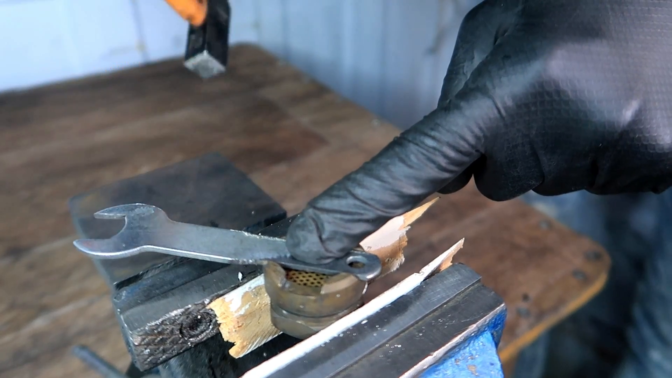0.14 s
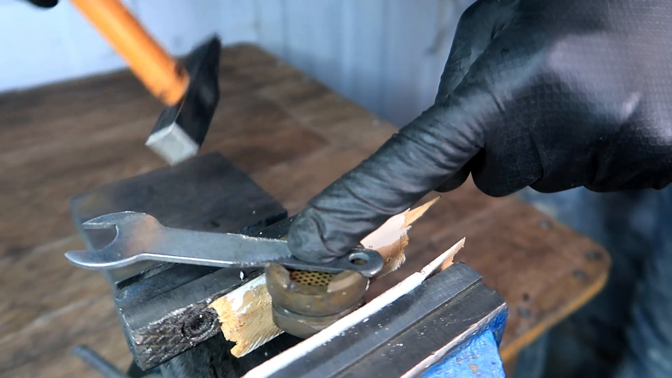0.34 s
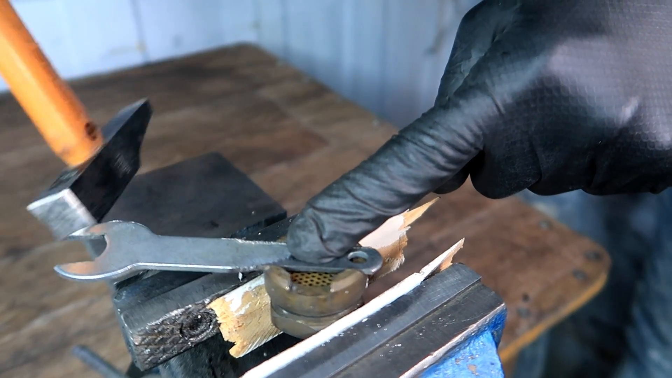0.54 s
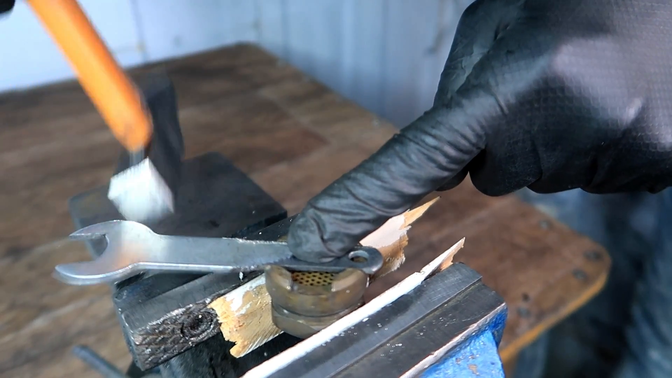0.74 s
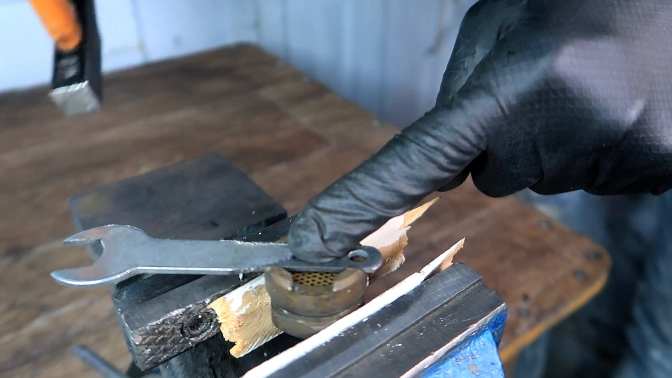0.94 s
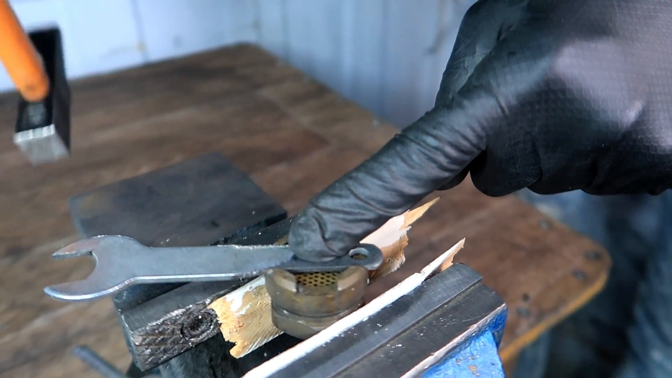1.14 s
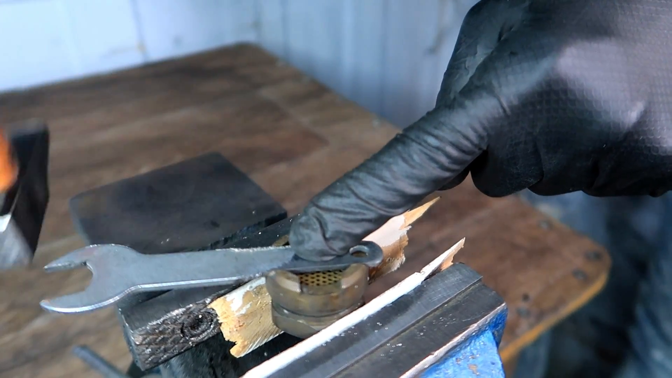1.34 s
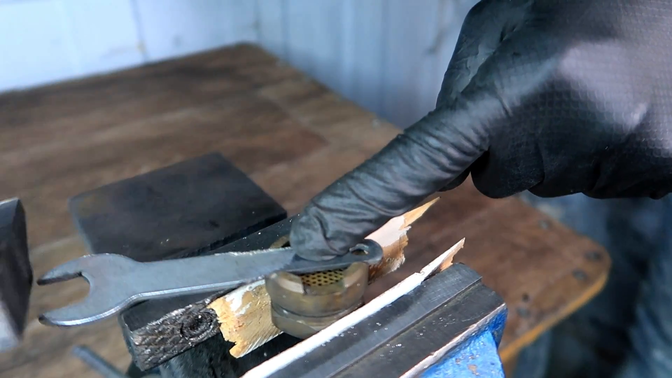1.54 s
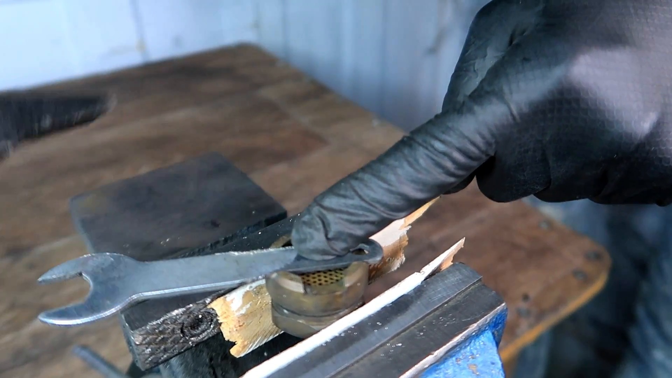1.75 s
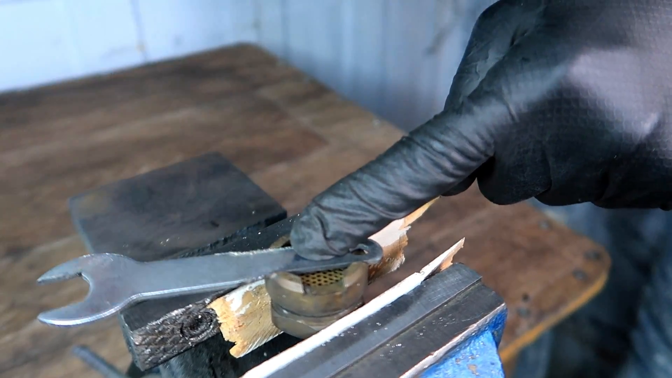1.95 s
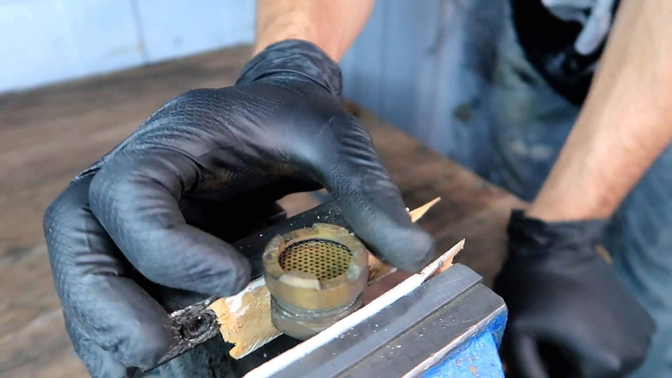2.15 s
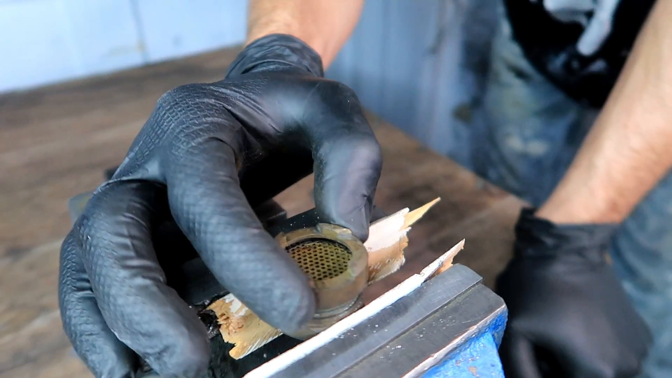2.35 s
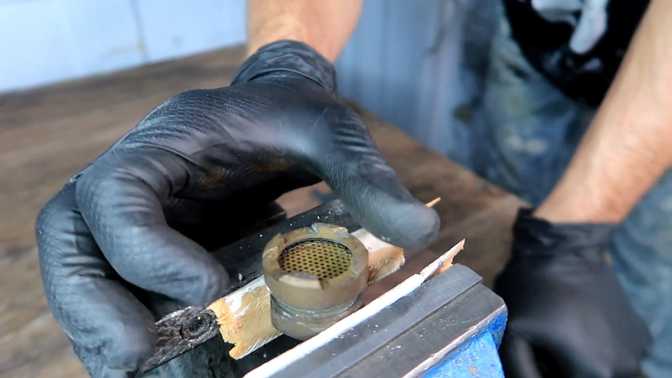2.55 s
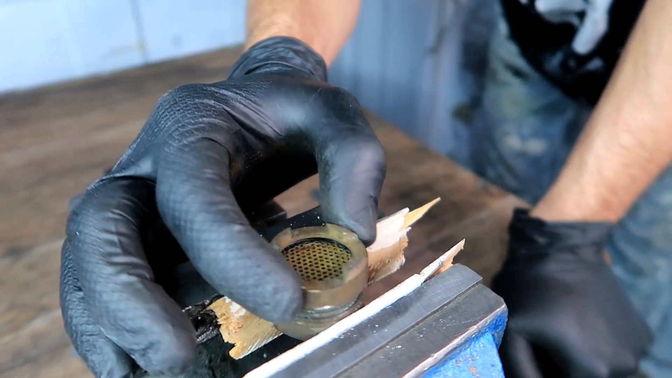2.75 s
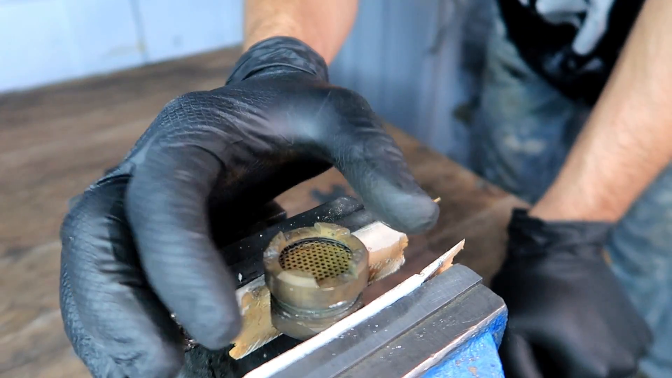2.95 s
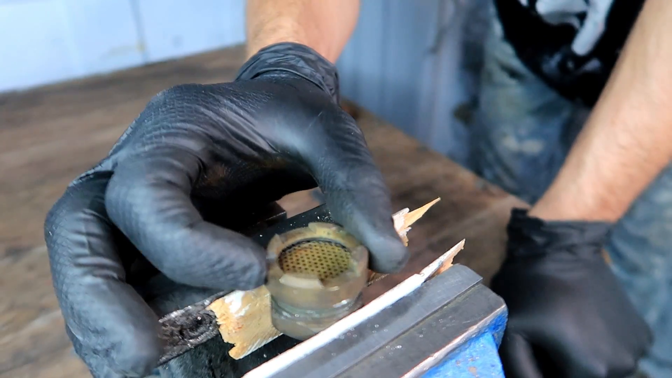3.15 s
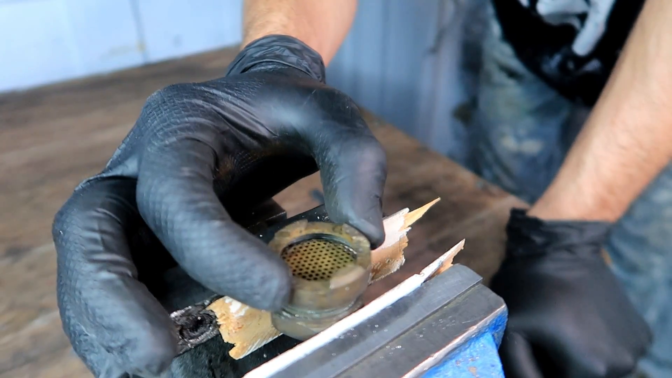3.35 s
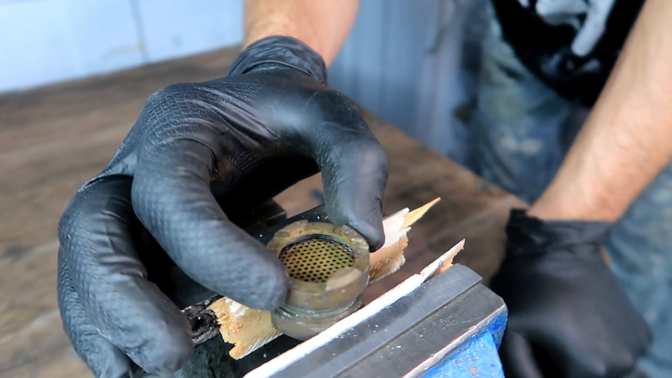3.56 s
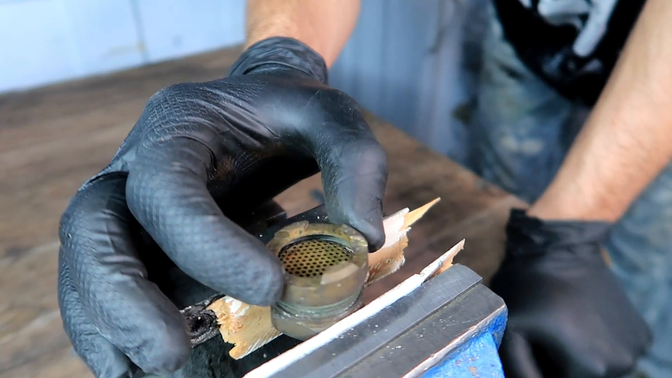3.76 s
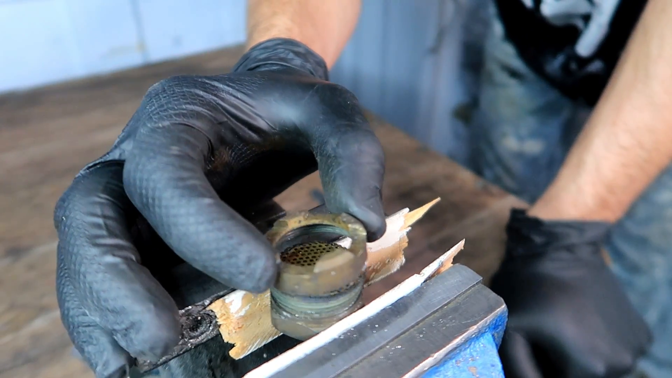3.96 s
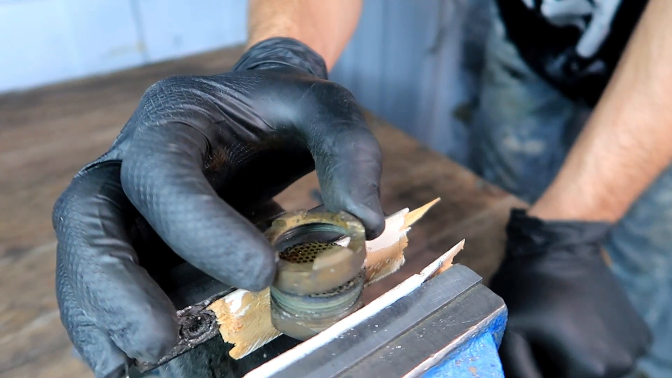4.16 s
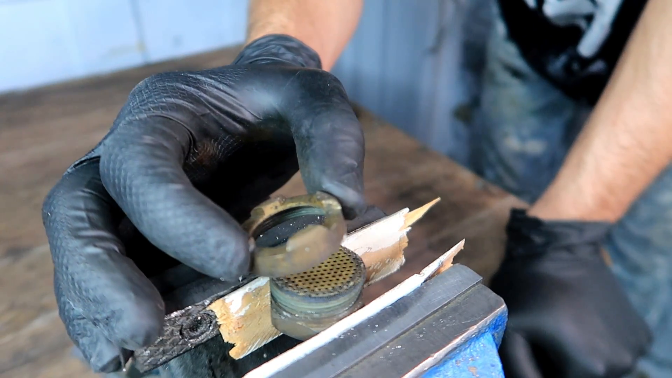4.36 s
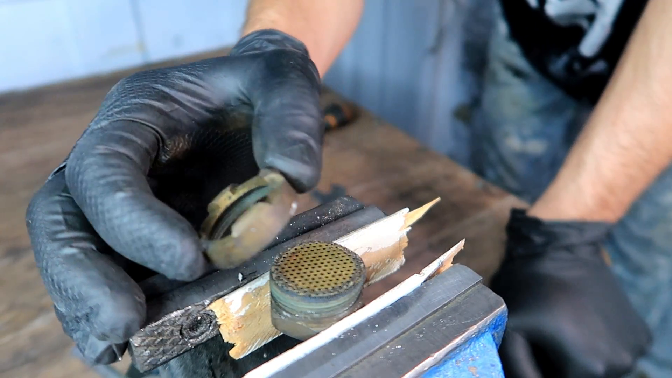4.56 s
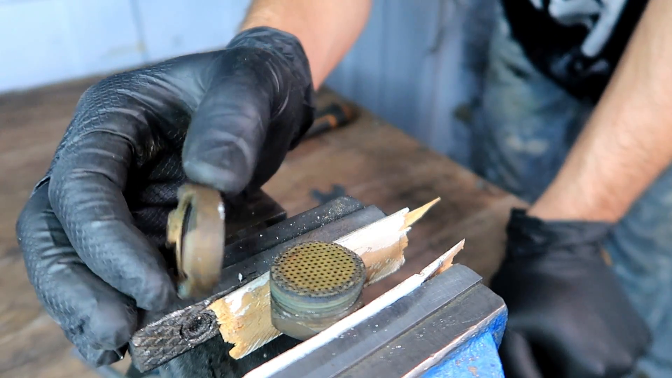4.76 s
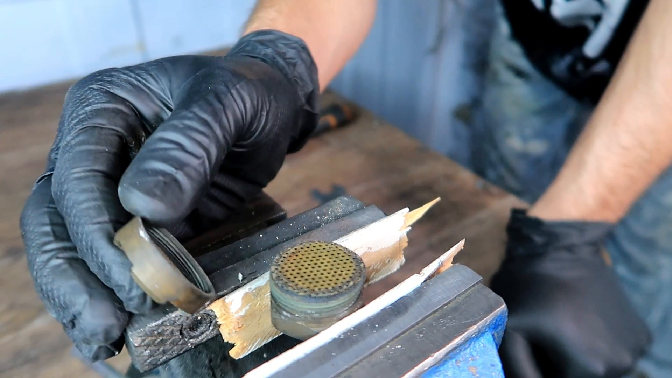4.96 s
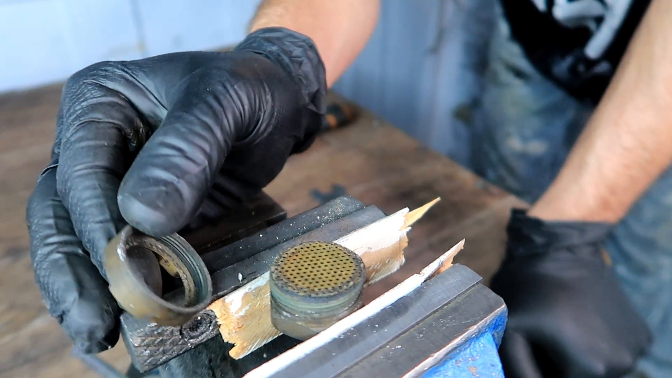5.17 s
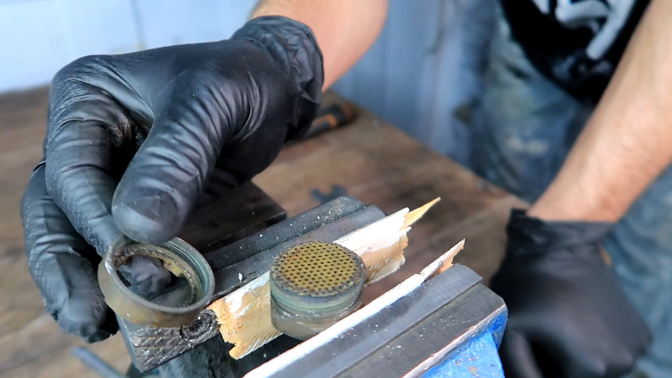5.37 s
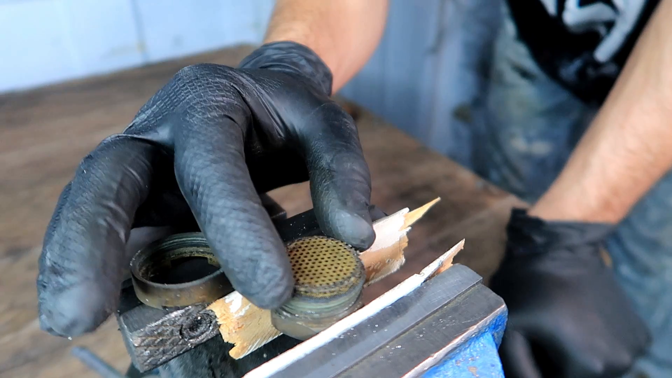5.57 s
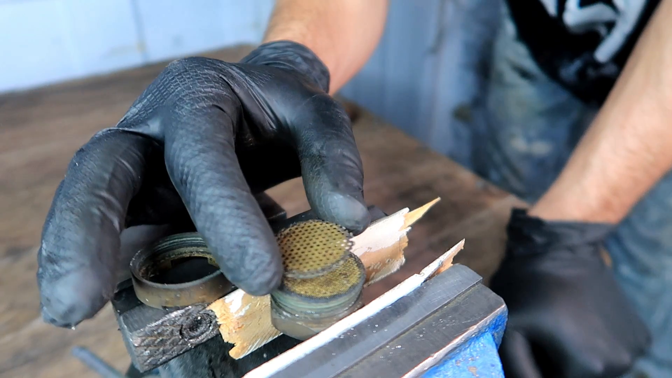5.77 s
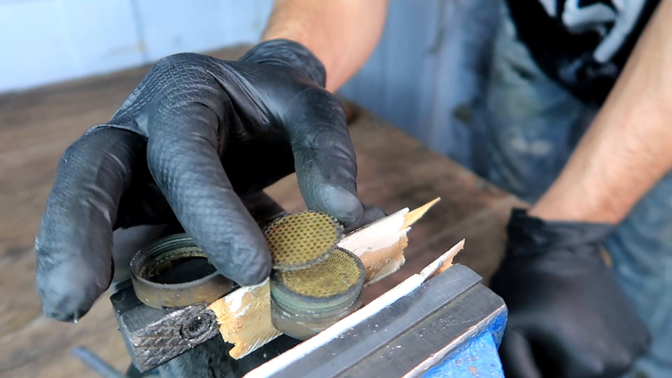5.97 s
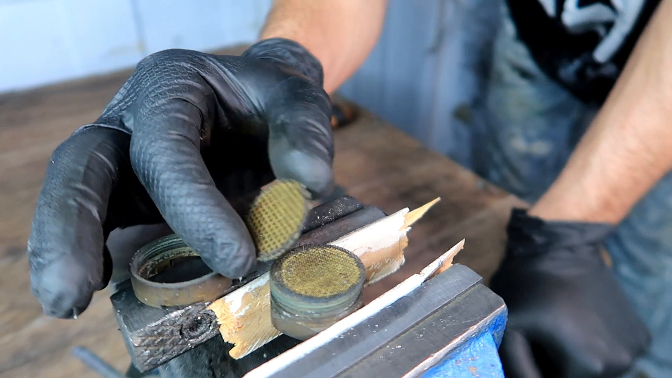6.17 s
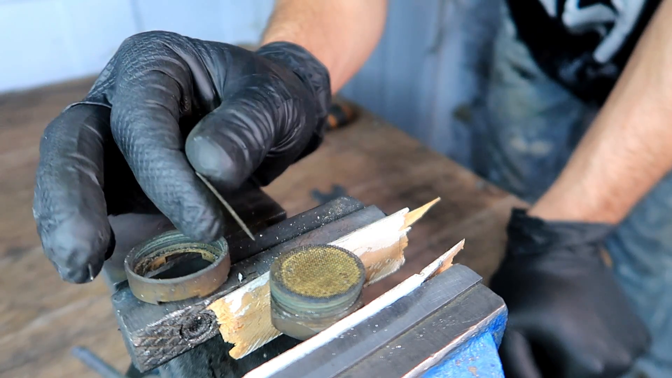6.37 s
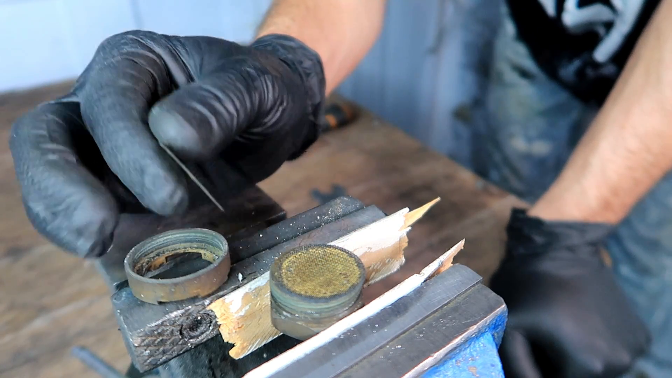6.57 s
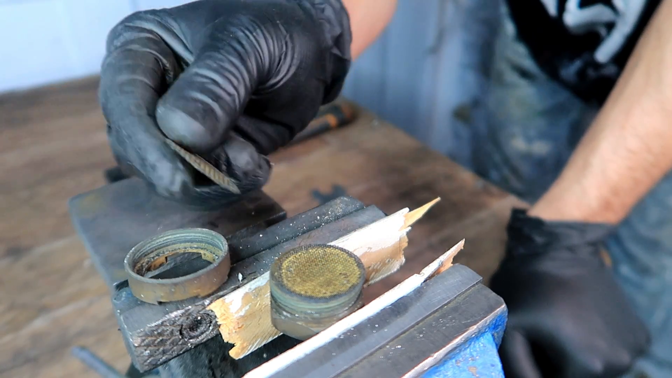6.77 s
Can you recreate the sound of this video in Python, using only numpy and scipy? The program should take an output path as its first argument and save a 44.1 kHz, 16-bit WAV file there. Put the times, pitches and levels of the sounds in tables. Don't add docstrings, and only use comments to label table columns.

```python
import sys
import numpy as np
from scipy import signal
from scipy.fft import rfft, irfft, next_fast_len
from scipy.io import wavfile
from scipy.ndimage import uniform_filter1d

SR = 44100
rng = np.random.default_rng(int(sys.argv[2]) if len(sys.argv) > 2 else 0)


def natural_amplitude(level_db):
    exponent = np.asarray(level_db, float) / 20
    return 10 ** exponent


def digitize_waveform(pressure):
    field = np.atleast_2d(pressure).T
    bounded = np.clip(field, -1, 1)
    quanta = np.round(bounded * 32767).astype(np.int16)
    wavfile.write(sys.argv[1], SR, quanta)


N = 300321
SIZE = next_fast_len(N)
HZ = np.fft.rfftfreq(SIZE, 1 / SR)

# pitch in Hz, level in dB per Hz.
AIR_COLOUR = [(12, -44), (20, -12.5), (63, -2), (86, -21.5), (111, -7.5), (147, -29.5), (169, -13.5),
              (323, -15), (465, -15.5), (535, -18), (939, -20), (11500, -39.5), (16500, -50.5)]
# pitch in Hz, width of its wavering in Hz, level in dB.
MAINS_HUM = [(61, 2.3, -74.5), (123, 7, -77.5), (182.8, 5.4, -81.5), (11700, 30, -104)]
# pitch in Hz, likeness from -1 to 1.
AIR_LIKENESS = [(60, 1), (150, 0.4), (380, 0.071), (950, -0.45), (2380, 0.14), (5980, -0.24),
                (15000, -0.83)]
# pitch in Hz, t60 in seconds.
SHOP_T60 = [(100, 0.27), (500, 0.25), (2000, 0.33), (8000, 0.15), (16000, 0.064)]
# pitch in Hz, likeness from -1 to 1.
SHOP_LIKENESS = [(60, 1), (150, .999), (400, .97), (1000, .96), (2400, .7), (6000, -.1), (15000, -.1)]
# pitch in Hz, phase in radians.
PORT_LEAD = [(60, 0), (300, -.03), (1500, -.2), (3000, -.45), (6000, -1.0), (9000, -2.1), (12000, -2.3),
             (16000, -2.6)]
# pitch in Hz, level in dB, t60 in seconds.
BENCH_MODES = [(48.58, -8.5, 0.31), (86, -10, 0.2), (97.77, -1.5, 0.4), (160, -11.5, .3),
               (174.3, -7.5, 0.49), (239, -7.5, 0.21), (303.6, -9, 0.27), (363, -7, 0.084), (397, -3.5, .3),
               (528.5, -11, 0.35), (576.5, -5.5, .3), (624, -10, .25), (712, 1, 0.18), (64.7, -5.5, 0.45),
               (1200, -6.5, .25), (1564, -9, 0.17), (1777, -8, .16)]
# pitch in Hz, level in dB.
VISE_COLOUR = [(180, -34), (300, -13.5), (725, -1.5), (961, -11), (2250, -4), (2980, -11.5), (3240, -12.5),
               (3890, -7.5), (4520, -7.5), (5250, -12.5), (11900, -18.5), (15000, -31.5), (16000, -60.5)]
# pitch in Hz, t60 in seconds.
VISE_T60 = [(300, 0.51), (790, 0.31), (2090, 0.17), (5510, 0.27)]
# pitch in Hz, level in dB.
SEAT_RATTLE = [(240, -8), (400, 5), (530, -1), (900, -26.5), (1200, 0), (2300, -2.5), (4200, -9),
               (5300, -3), (6000, -17), (10000, -19), (13700, -53), (16000, -70)]
# fastest moment in seconds, level in dB, build-up and let-go in seconds.
CUFF_BRUSHES = [
    (1.92, -65.5, 0.27, 0.216),
    (2.36, -66.5, 0.062, .07),
    (2.53, -62.5, 0.089, 0.105),
    (2.79, -74, 0.059, 0.069),
    (3.34, -73.5, 0.1, 0.096),
    (6.323, -62, 0.024, 0.061),
    (6.81, -59.5, 0.017, .05),
]
# fastest moment in seconds, level in dB, build-up in seconds,
# let-go in seconds, squeak pitch in Hz.
GLOVE_SLIDES = [(1.849, -63, 0.11, 0.14, 2000), (1.93, -61.5, 0.15, 0.16, 2427),
                (2.29, -62, 0.24, 0.17, 2600), (2.37, -58, 0.072, 0.11, 2910), (2.54, -47, .17, 0.12, 2340),
                (2.83, -60.5, 0.19, 0.073, 3320), (3.191, -78.5, .1, 0.12, 3150),
                (3.34, -69, .2, 0.13, 2980), (3.55, -72, 0.033, .06, 2830),
                (3.738, -69.5, .015, 0.065, 4300), (5.04, -69.5, 0.028, .04, 2370),
                (5.23, -61, 0.022, 0.038, 2388), (5.38, -70, 0.12, 0.11, 2320),
                (5.52, -74, 0.063, .06, 2500), (6.325, -74, 0.041, 0.065, 3100),
                (6.418, -66.5, .015, .02, 2290), (6.77, -71.5, 0.1, 0.065, 2300)]
# factor on the squeak pitch, width in Hz, level in dB.
GLOVE_RESONANCES = [(.96, 970, 15.5), (1.5, 1560, 1), (2.1, 2200, -62)]
# fastest moment in seconds, level in dB, build-up in seconds, let-go in seconds, looseness from 0 to 1.
RING_TWISTS = [(0.0, -60, .02, 0.062, 0), (1.74, -67.5, .04, 0.054, 0.2), (2.014, -61, 0.073, 0.11, 0.35),
               (2.37, -56.5, 0.17, 0.16, 0.42), (2.525, -42.5, 0.13, 0.14, 0.01),
               (2.83, -52.5, 0.14, 0.11, 0.64), (3.23, -63.5, 0.04, 0.092, .3),
               (3.34, -57.5, 0.1, 0.13, 0.67), (3.56, -67, .04, 0.058, .3),
               (5.04, -59.5, 0.034, 0.045, 0.41), (5.1, -57.5, 0.037, 0.025, 0.46),
               (5.229, -60, 0.041, 0.039, 0.49), (5.42, -69.5, 0.069, .15, 0.4),
               (5.531, -71.5, 0.092, 0.052, 0.36), (6.32, -63.5, 0.077, 0.098, 0.4),
               (6.418, -62.5, 0.014, 0.014, .6), (6.79, -76, 0.086, .08, 0.1)]
# pitch in Hz, level in dB, t60 in seconds.
RING_MODES = [(452, -15, 0.19), (587, -57, 0.078), (770, -20.5, 0.08), (1228, -8, 0.051),
              (1727, -8.5, 0.12), (2302, -5.5, 0.032), (2786, -0.5, 0.03), (3300, -1.5, 0.041),
              (3500, -5.5, 0.0093), (4440, -12, 0.052), (6130, -22, 0.045), (7876, -5, 0.027)]
# pitch in Hz, level in dB, t60 in seconds.
RING_BELL = [(5130, -24, .27), (7220, -33, .2), (8850, -37, .1), (9480, -37, .1), (12500, -39, .1),
             (13400, -31, .24)]
# start in seconds, peak in dB, favoured pitch in Hz,
# width of that emphasis in octaves, edge pitch in Hz.
RING_CLICKS = [(1.965, -52, 2900, 0.76, 3330), (2.703, -53.5, 1200, 1.4, 4100),
               (2.755, -51, 3380, 0.72, 3345), (2.782, -48, 1320, 1.9, 3540), (3.204, -43, 1297, 1.2, 3460),
               (3.314, -56.5, 1097, 1.5, 5800), (3.729, -60.5, 2910, 0.92, 4500),
               (3.832, -51.5, 2790, 0.69, 4700), (3.859, -46, 1727, 1.6, 3603),
               (4.887, -18.5, 2200, 1.56, 2600), (5.096, -67.5, 1208, 1.2, 3895),
               (5.203, -41, 1482, 1.4, 2334), (5.398, -47, 1254, 1.8, 1490), (6.271, -59, 1410, 1.4, 2790),
               (6.292, -56, 2250, 0.91, 2780), (6.313, -46.5, 3180, 1.73, 4920),
               (6.338, -62, 2500, 3.6, 4530), (6.416, -55.5, 1730, 0.97, 2250),
               (6.804, -55, 2710, 0.77, 4190)]
# pitch in Hz, level in dB, t60 in seconds.
WRENCH_MODES = [(1536, -9, 0.036), (2200, -8, 0.011), (2600, 0.5, 0.012), (3330, 0, 0.0096),
                (3820, -4, 0.0093), (4539, 1, 0.012), (5470, -10, 0.0076), (7222, -8, 0.014),
                (7730, -7, 0.0087), (9560, -13, 0.0064), (10800, -24.5, 0.015), (13450, -30, .004)]
# pitch in Hz, level in dB, t60 in seconds.
WRENCH_SING = [(3335, -36, .2), (4380, -37, .18), (4560, -34, .2), (4720, -36, .18), (4880, -39, .18)]
# start in seconds, peak in dB, jaw-tip ring in dB,
# edge brightness in dB per octave, shaft knock in dB.
HAMMER_BLOWS = [
    (0.0674, -6, -1.5, 2, 5),
    (0.3235, -5, -2, 0.9, 2.5),
    (0.5757, -6, 2, 1.3, -2.5),
    (0.8396, -7, 1.5, 0, 3),
    (1.094, -4.5, 4, 1, -7.5),
    (1.3389, -5.5, 5.5, -1, -10.5),
    (1.5888, -7, 5, 0.1, -4.5),
]


def evened(x):
    return x / np.sqrt(np.mean(x ** 2) + 1e-20)


def read(points, hz):
    f, value = np.transpose(points)
    return np.interp(np.log(hz + 1), np.log(f + 1), value)


def add(mix, s, sound):
    part = mix[..., round(s * SR):][..., :sound.shape[-1]]
    part += sound[..., :part.shape[-1]]


def ringing(hz, db, t60, seconds, rise=1e-4, phase=0., rough=0.):
    t = np.arange(round(seconds * SR)) / SR
    hz, db, t60, phase = (np.reshape(v, (-1, 1)) for v in (hz, db, t60, phase))
    wander = uniform_filter1d(rng.standard_normal((len(hz), len(t))), size=130)
    flutter = 1 + rough * evened(wander)
    modes = natural_amplitude(db - 60 * t / t60) * flutter * np.sin(2 * np.pi * hz * t + phase)
    return modes.sum(0) * (1 - np.exp(-t / rise))


def resonate(x, hz, width):
    r = np.exp(-np.pi * width / SR)
    if np.ndim(hz) == 0:
        return 2 * signal.lfilter([1 - r], [1, -r * np.exp(2j * np.pi * hz / SR)], x).real
    turn = np.exp(2j * np.pi * np.cumsum(hz) / SR)
    return 2 * (turn * signal.lfilter([1 - r], [1, -r], x * turn.conj())).real


def resonate_twice(x, hz, width):
    return resonate(resonate(x, hz, width), hz, width)


def clatter(colour, damping, seconds, rise):
    noise = rng.standard_normal((2, round(seconds * SR)))
    hz, t, z = signal.stft(noise, SR, nperseg=256, noverlap=192)
    db = read(colour, hz)[:, None] - 60 * t / read(VISE_T60, hz)[:, None] / damping
    x = signal.istft(z * natural_amplitude(db), SR, nperseg=256, noverlap=192)[1]
    return evened(x) * (1 - np.exp(-np.arange(x.shape[1]) / SR / rise))


def stroke(s, db, rise, fall):
    t = np.arange(0, N + 64, 64) / SR - s
    away = np.minimum(np.where(t < 0, -t / rise, t / fall), 3)
    return natural_amplitude(db - 24.5 * away ** 1.3)


def ports(a, b, same, lead):
    same = np.clip(same, -1, 1)
    left, other = rfft(a, SIZE), rfft(b, SIZE)
    right = same * left + np.sqrt(1 - same ** 2) * other
    return irfft([left * np.exp(.5j * lead), right * np.exp(-.5j * lead)], SIZE)[:, :N]


def air():
    air_db, ease_from_s, ease_over_s, ease_db = -64.0, 4.45, 1.4, -4
    noise = rfft(rng.standard_normal((2, SIZE)))
    a, b = evened(irfft(noise * natural_amplitude(read(AIR_COLOUR, HZ)), SIZE))
    hum = sum(natural_amplitude(db) * evened(resonate(rng.standard_normal(N), f, w)) for f, w, db in MAINS_HUM)
    room = natural_amplitude(air_db) * ports(a, b, read(AIR_LIKENESS, HZ), 0) + hum
    rumble = signal.sosfiltfilt(signal.butter(3, 105, fs=SR, output="sos"), room)
    eased = np.clip((np.arange(N) / SR - ease_from_s) / ease_over_s, 0, 1)
    return room + rumble * (natural_amplitude(ease_db * eased) - 1)


def shop(x):
    taps = np.zeros((2, SR // 2))
    slots = np.arange(200, SR // 2 - 16, 16)
    at = slots + rng.integers(0, 16, (2, len(slots)))
    np.put_along_axis(taps, at, rng.choice([-1., 1.], at.shape), 1)
    hz, t, z = signal.stft(taps, SR, nperseg=256)
    dying = natural_amplitude(-60 * t / read(SHOP_T60, hz)[:, None])
    tail = signal.istft(z * dying, SR, nperseg=256)[1]
    a, b = signal.fftconvolve(x[None], tail / np.linalg.norm(tail[0]), axes=1)[:, :N]
    return ports(a, b, read(SHOP_LIKENESS, HZ), 0)


def slip_grains():
    strength = natural_amplitude(3.81 * np.minimum(rng.exponential(1, (4, N)), 3.0))
    slips = rng.standard_normal((4, N)) * strength * (rng.random((4, N)) < .15)
    slips *= natural_amplitude(1.5 * evened(uniform_filter1d(rng.standard_normal(N), 300)))
    slips[:3] = signal.sosfilt(signal.butter(3, 6500, fs=SR, output="sos"), slips[:3])
    return slips


def rubbing():
    soft_glove, soft_bench, soft_ring, sharp = slip_grains()
    moment, squeak = np.transpose(GLOVE_SLIDES)[[0, -1]]
    squeak_hz = np.interp(np.arange(N) / SR, moment, squeak)
    glove = sum(natural_amplitude(db) * resonate_twice(soft_glove, k * squeak_hz, w) for k, w, db in GLOVE_RESONANCES)
    bench = sum(natural_amplitude(db) * resonate(resonate(soft_bench, hz, 29.0), hz, 90.0)
                for hz, db, _ in BENCH_MODES[3:12])
    ring = sum(resonate(soft_ring, hz, 28.0) for hz, _, _ in RING_MODES[2:5])
    ring = ring + natural_amplitude(-20.5) * sum(resonate(sharp, hz, 86.0) for hz, _, _ in RING_MODES[8:11])
    thread = resonate_twice(soft_ring, 1200, 1300.0)
    hiss = resonate(resonate(sharp, 4000, 3300.0), 5000, 6000.0)
    hiss = hiss + natural_amplitude(-16.5) * resonate_twice(sharp, 11000, 5000.0)

    slide = sum(stroke(*row[:-1]) for row in GLOVE_SLIDES)
    brush = natural_amplitude(-21) * slide + sum(stroke(*row) for row in CUFF_BRUSHES)
    turns = np.array([stroke(*row[:-1]) for row in RING_TWISTS])
    loose = np.clip(np.transpose(RING_TWISTS)[-1], 0, 1)
    shake = natural_amplitude(-0.5 - 17 * loose) @ turns
    layers = [(slide, glove), (shake, bench), (loose @ turns, ring), ((1 - loose) @ turns, thread),
              (brush, hiss)]
    at = np.arange(N) / 64
    return sum(np.interp(at, np.arange(len(level)), level) * evened(x) for level, x in layers)


def ring_knock(db, hz, octaves, edge_hz):
    f, level, t60 = np.transpose(RING_MODES)
    detune, uneven, phase = rng.standard_normal((3, len(f)))
    favour_db = -5.0 * np.minimum((np.log2(f / hz) / octaves) ** 2, 4)
    shy = (abs(f - 2150) < 150) | (abs(f - 3190) < 150)
    level = level + favour_db + .3 * (db + 18) * shy + 1.3 * uneven
    knock = ringing(f * (1 + 0.0017 * detune), level, t60 * 0.54, .25, rise=0.0009,
                    phase=.5 * phase, rough=0.17)
    edge = ringing([hz, edge_hz, 1.5 * edge_hz], [-1.5, -4.0, -11.0], [.025, .035, .004], .25, rough=0.27)
    knock = knock + edge
    return knock / abs(knock).max()


def clicks():
    out, spread = np.zeros(N), np.zeros((2, N))
    bell_hz, bell_db, bell_t60 = np.transpose(RING_BELL)
    for s, db, hz, octaves, edge_hz in RING_CLICKS:
        knock = ring_knock(db, hz, octaves, edge_hz)
        add(out, s - .0002, natural_amplitude(db + 1.0) * knock)
        chatter_s = 0.0051 + 0.0022 * abs(rng.standard_normal())
        add(out, s + chatter_s, natural_amplitude(db - 2.0) * knock)
        bell = ringing(bell_hz, bell_db, bell_t60, .3, rise=0.00025, rough=0.8)
        add(out, s, natural_amplitude(1.56 * db + 9.0) * bell)
        seat = [(f, level - 5.3 * min((np.log2(f / hz) / octaves) ** 2, 4)) for f, level in SEAT_RATTLE]
        add(spread, s, natural_amplitude(1.113 * db - 21.5) * clatter(seat, 0.54, .3, rise=0.00067))
    return out, spread


def wrench_crack(tip_db, bright_db, shaft_db):
    f, level, t60 = np.transpose(WRENCH_MODES)
    detune, uneven = rng.standard_normal((2, len(f)))
    tip_shape = (abs(f - 4300) < 800) - 0.36 * (abs(f - 2600) < 200)
    level = level + bright_db * np.log2(f / 4000) + shaft_db * (f < 2350) + tip_db * tip_shape + uneven
    crack = ringing(f * (1 + .012 * detune), level, t60, .04, rise=0.00041, rough=0.45)
    crack[:60] += natural_amplitude(-11.5 + 2 * bright_db) * rng.standard_normal(60) * np.hanning(60)
    return crack


def wrench_sing(tip_db):
    f, level, t60 = np.transpose(WRENCH_SING)
    detune, uneven = rng.standard_normal((2, len(f)))
    level = level + 0.52 * tip_db + uneven
    return ringing(f * (1 + 0.0038 * detune), level, t60, 0.4, rise=0.0019, rough=0.35)


def bench_thump(thump_db, vise_db, shaft_db):
    f, level, t60 = np.transpose(BENCH_MODES)
    detune, uneven, phase = rng.standard_normal((3, len(f)))
    level = level + np.select([f < 210, f < 1000], [thump_db, vise_db], shaft_db) + 2 * uneven
    return ringing(f * (1 + 0.0071 * detune), level, t60, 1.0, rise=0.0081, phase=.5 * phase, rough=0.52)


def hammer():
    out, spread = np.zeros(N), np.zeros((2, N))
    for s, db, tip_db, bright_db, shaft_db in HAMMER_BLOWS:
        vise_db, thump_db = -4.0 + 0.25 * shaft_db, -0.16 + 0.25 * shaft_db
        crack = wrench_crack(tip_db, bright_db, shaft_db)
        add(out, s + 0.00028, natural_amplitude(db - 1.0) * crack)
        rebound_s = .0018 + .0001 * rng.standard_normal()
        add(out, s + rebound_s, -natural_amplitude(db - 11.5) * crack)
        add(out, s, natural_amplitude(db) * wrench_sing(tip_db))
        add(out, s, natural_amplitude(db - 24.0) * bench_thump(thump_db, vise_db, shaft_db))
        add(spread, s, natural_amplitude(db + vise_db - 32.0) * clatter(VISE_COLOUR, 0.84, .5, rise=0.001))
    return out, spread


def scene():
    blows, vise = hammer()
    knocks, seat = clicks()
    hand = knocks + rubbing()
    lead = read(PORT_LEAD, HZ)
    direct = ports(blows, blows, 1, lead) + ports(hand, hand, 1, 0.62 * lead)
    around = ports(*(vise + seat), read(SHOP_LIKENESS, HZ), 0)
    wet = shop(natural_amplitude(-12.0) * blows + natural_amplitude(-9.5) * vise[0] + natural_amplitude(-10.0) * (hand + seat[0]))
    return direct + around + wet + air()


def top_cut(x):
    return signal.sosfilt(signal.butter(12, 16830, fs=SR, output="sos"), x)


def record(dry):
    dry = signal.sosfilt(signal.butter(8, 16300, fs=SR, output="sos"), dry)
    power = abs(uniform_filter1d((dry ** 2).mean(0), 200))
    ahead = np.append(abs(uniform_filter1d(power, 500))[500:], np.zeros(500))
    hush = np.sqrt(1 + ahead / (power * natural_amplitude(41.0) + 1e-12))
    hushed = np.tanh(dry / 1.264) * 1.407 / hush
    z = signal.stft(dry, nperseg=704, noverlap=528)[2]
    above_bass = (np.arange(353) > 10)[:, None]
    pale = np.sqrt(abs(uniform_filter1d(abs(z) ** 2, size=60, axis=1))) * above_bass
    random_phase = np.exp(2j * np.pi * rng.random(z.shape))
    smear = signal.istft(pale * random_phase, nperseg=704, noverlap=528)[1][:, :N]
    return top_cut(hushed + natural_amplitude(-15.5) * smear)


dry = scene()
out = record(dry)
digitize_waveform(out)
```